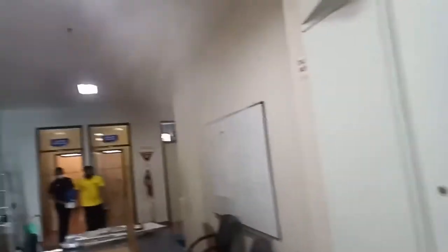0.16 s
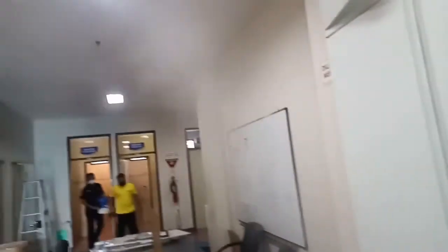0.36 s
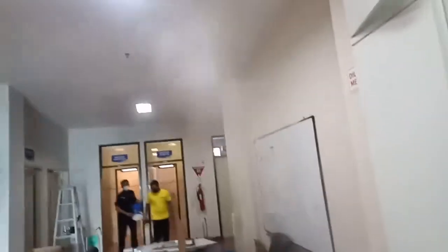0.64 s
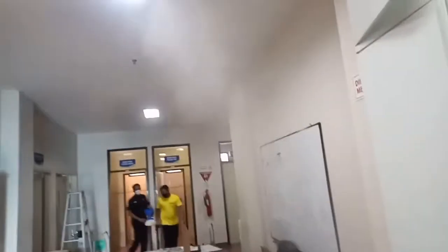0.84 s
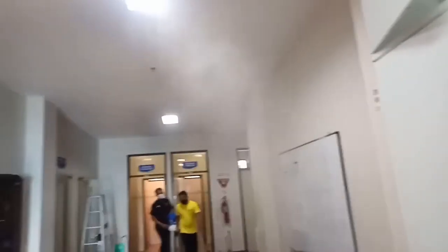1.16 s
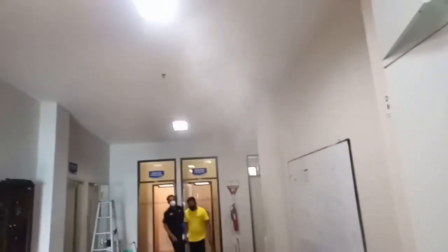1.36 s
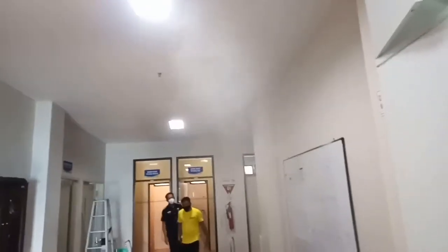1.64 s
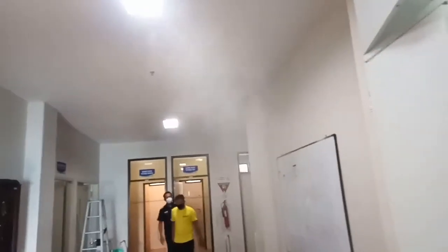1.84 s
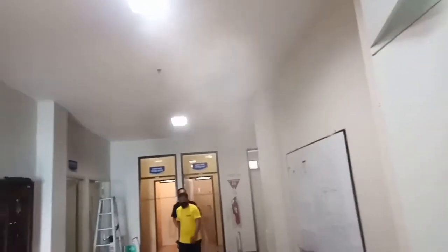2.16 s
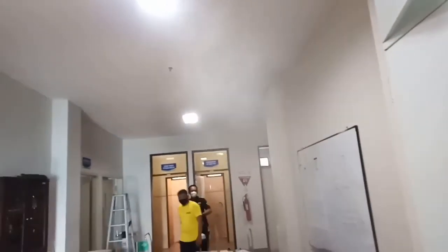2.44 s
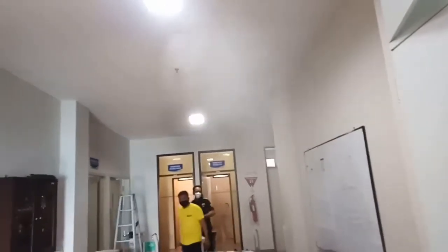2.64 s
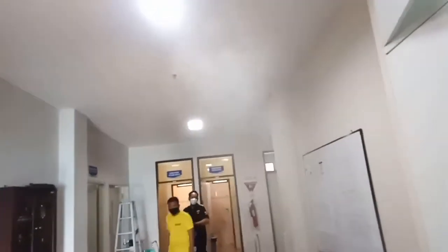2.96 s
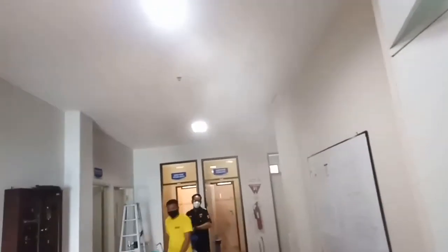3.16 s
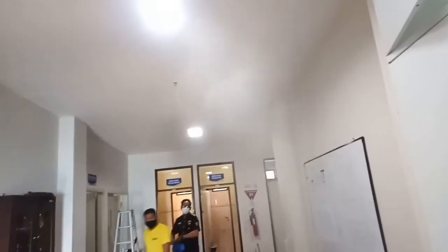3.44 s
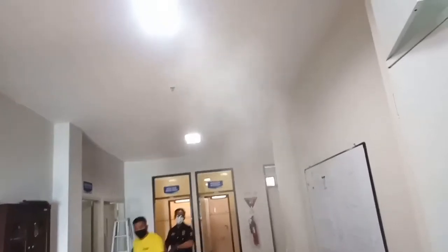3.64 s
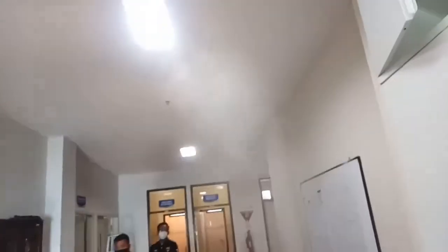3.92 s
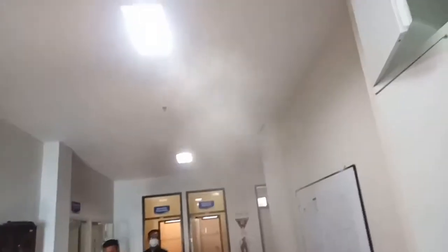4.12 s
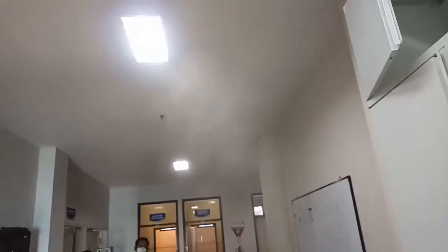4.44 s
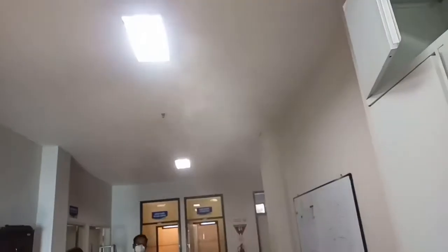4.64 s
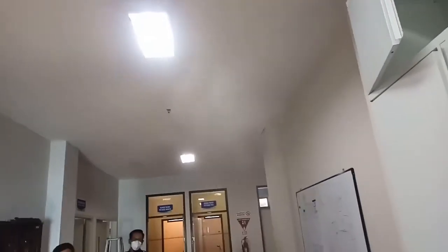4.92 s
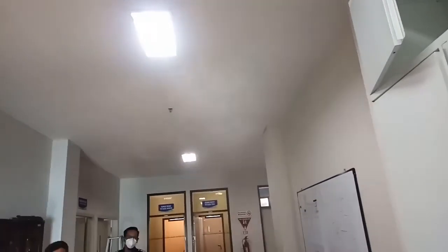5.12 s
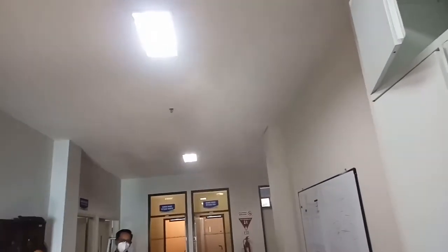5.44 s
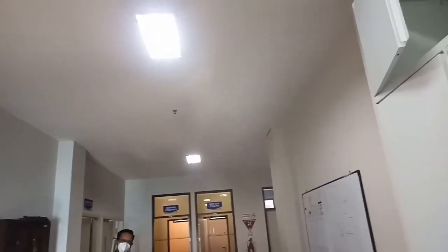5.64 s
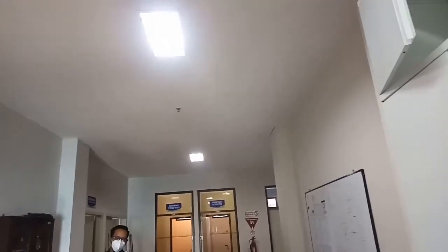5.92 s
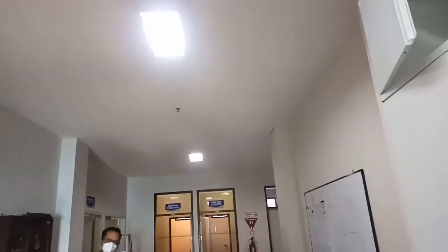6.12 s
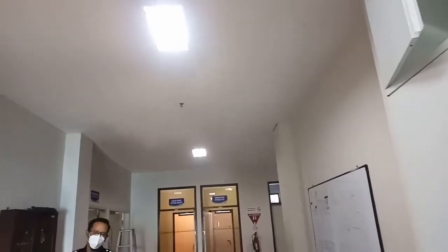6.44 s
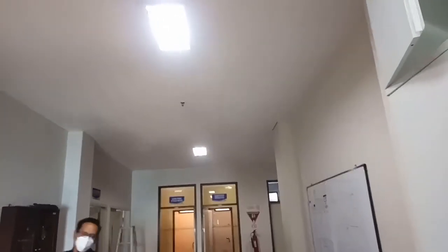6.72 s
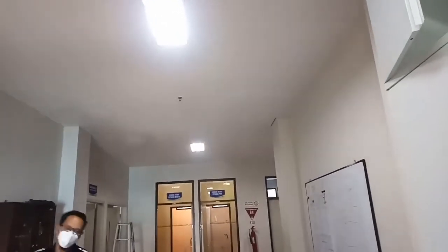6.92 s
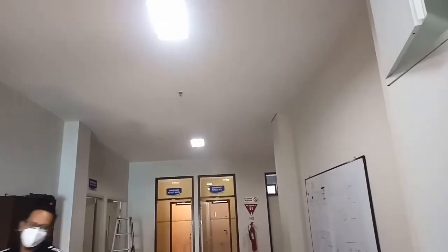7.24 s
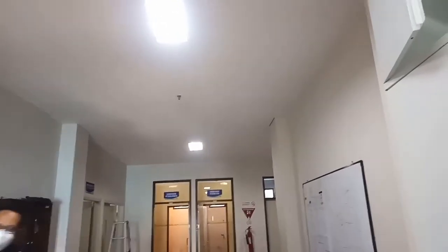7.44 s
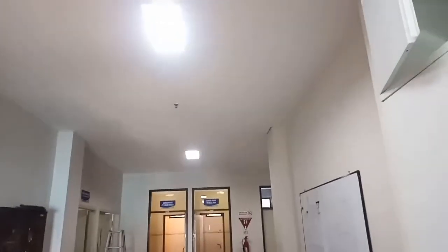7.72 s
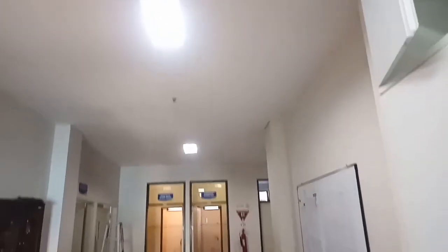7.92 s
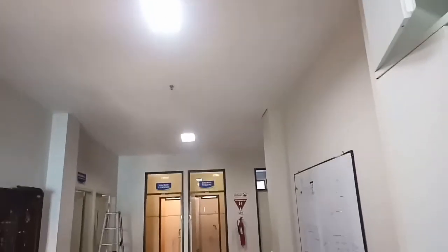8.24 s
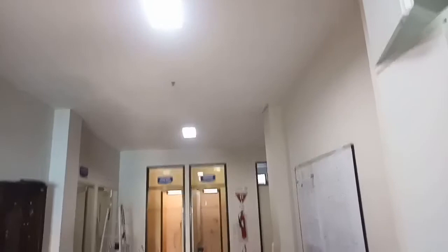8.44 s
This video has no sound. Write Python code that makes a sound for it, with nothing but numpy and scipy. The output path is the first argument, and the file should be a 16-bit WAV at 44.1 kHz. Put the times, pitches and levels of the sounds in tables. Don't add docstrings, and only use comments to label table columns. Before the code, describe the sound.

Steady motor hum and airy hiss of a mist blower indoors, followed by a piercing, fluttering whine that falls in pitch and dies away.

```python
import sys
import numpy as np
from scipy import signal
from scipy.fft import rfft, irfft, next_fast_len
from scipy.io import wavfile
from scipy.ndimage import uniform_filter1d, minimum_filter1d

SR = 44100
rng = np.random.default_rng(int(sys.argv[2]) if len(sys.argv) > 2 else 0)


def volts_from_db(level):
    exponent = np.asarray(level, float) / 20
    return 10 ** exponent


def generate_wav(sig):
    pcm = np.round(np.clip(np.atleast_2d(sig).T, -1, 1) * 32767).astype(np.int16)
    wavfile.write(sys.argv[1], SR, pcm)


N = 378378

RUN_HZ, OFF_S = 532.7, 4.0
BLADES = 9
# start_s (centre), level_db, half_length_s
ECHO_SWELLS = [(4.645, 7.5, 0.0055), (4.785, 8, 0.0045), (4.971, 2.5, 0.0015), (4.981, 3.5, 0.0016),
               (5.096, 5, 0.0029), (5.515, 5, 0.0044), (5.539, 6, .002), (5.575, 7.5, 0.0016),
               (5.594, 8, .002), (5.622, 8, 0.0045), (5.655, 5.5, 0.0013), (5.676, 4, 0.0047),
               (5.735, 5, 0.0063), (5.777, 5.5, 0.0018)]
# start_s, rush_db, brightening_db_per_octave (nozzle aimed nearer)
AIR_FLOW = [(0, -11, -1), (.9, -12.5, 1), (1.34, -12.5, 1.5), (1.8, -13.5, -4.5), (2.7, -14.5, -0.5),
            (3.3, -13.5, -2.5), (4.1, -17, -5.5), (4.7, -11.5, 0.5), (5.0, -20, 0.5), (5.3, -18, -9),
            (5.62, -14, -3), (5.9, -20, -1.5), (6.4, -17, -3), (7.1, -21, 0.5), (8.1, -29, -4),
            (8.58, -33.5, -7)]


def rms_one(x):
    return x / np.sqrt(np.mean(np.abs(x) ** 2) + 1e-20)


def in_time(rows, s):
    at, *columns = np.transpose(rows)
    return np.array([np.interp(s, at, column) for column in columns])


def at_hz(points, hz):
    point_hz, point_db = np.transpose(points)
    return np.interp(np.log(hz), np.log(point_hz), point_db)


def drift(rate_hz):
    r = np.exp(-2 * np.pi * rate_hz / SR)
    noise = rng.standard_normal(N + SR)
    return rms_one(signal.lfilter([1], [1, -2 * r, r * r], noise)[SR:])


def bumps_db(events):
    s = np.arange(N) / SR
    return sum(db * np.exp(-((s - at) / half) ** 2) for at, db, half in events)


def fade_out(s, centre_s, lasts_s):
    return .5 - .5 * np.tanh((s - centre_s) / lasts_s)


def speed(s):
    drag_hz, drag_per_s, drag_angle = 163.8, .15388, 1.27457
    coasting = drag_hz * np.tan(drag_angle - drag_per_s * np.maximum(s - OFF_S, 0))
    return np.minimum(RUN_HZ, coasting)


def hum(s):
    # start_s, level_db (rms)
    hum_curve = [
        (0, -46.5),
        (2, -44.5),
        (4.05, -42.5),
        (4.3, -68.5),
        (6.5, -52),
        (8.58, -56),
    ]
    level = volts_from_db(in_time(hum_curve, s)[0] + 2.2 * drift(3))
    return np.sqrt(2) * level * np.sin(2 * np.pi * 99.3 * s + 1.1 * drift(3))


def scuff(s):
    start_s, level_db = 8.548, -31
    band = signal.butter(5, [120, 2600], "band", fs=SR, output="sos")
    dull = signal.sosfilt(band, rng.standard_normal(N))
    return volts_from_db(level_db) * rms_one(dull) * np.clip((s - start_s) / .015, 0, 1)


def air_levels_db(s):
    # start_s (centre), lift_db, half_length_s
    nozzle_sweeps = [(0, -1, 0.15), (.25, 0.5, 0.22), (.71, 3, 0.089), (1.25, 1, 0.1), (1.74, 3, 0.1),
                     (2.14, 2.5, 0.14), (2.47, 3.5, 0.18), (3.05, 4, 0.12), (3.54, 5, .1),
                     (3.85, 2.5, 0.15), (4.07, 6, 0.11)]
    rush_db = in_time(AIR_FLOW, s)[0]
    sweeps_db = np.interp(s, np.arange(N) / SR, bumps_db(nozzle_sweeps))
    hidden = fade_out(s, 1.3, .3)
    turning = speed(s) / RUN_HZ

    def region_db(full_db, rush_share, speed_power, hidden_db, sweep_share):
        flow_db = full_db + rush_share * (rush_db + 13)
        speed_db = speed_power * 20 * np.log10(turning)
        return flow_db + speed_db + hidden_db * hidden + sweep_share * sweeps_db

    def with_cooling(level_db, cooling_db):
        return 10 * np.log10(volts_from_db(2 * level_db) + volts_from_db(2 * cooling_db) * turning ** (2 * 1.72))

    rumble = region_db(-28.5, .4, .49, -6.5, .48)
    nozzle = with_cooling(region_db(-34, .25, 2.5, -1, .8), -45.5)
    top = with_cooling(region_db(-32, .6, 2.5, -3.5, .8), -38.5)
    return np.vstack([rumble, rush_db + sweeps_db - .73, nozzle, top])


def air():
    region_centres = [500, 2500, 7500, 13000]
    # pitch_hz, level_db (per Hz)
    rush_colour = [(20, -30.5), (45, -44), (90, -25), (170, -27), (250, -22), (450, -13), (700, -16.5),
                   (1200, -16.5), (2300, -13), (3100, -12.5), (3800, -13.5), (4350, -23), (5000, -35.5),
                   (5700, -47.5)]
    # pitch_hz, level_db (per Hz)
    coast_colour = [(20, -29), (60, -31.5), (130, -15), (250, -16.5), (450, -10.5), (650, -14), (900, -11),
                    (1100, -14), (1550, -9), (2300, -14), (3450, -15), (4200, -31), (5000, -54),
                    (5700, -63)]
    # pitch_hz, level_db
    hiss_colour = [(5700, 0), (6500, 2), (7600, -1), (9700, -4), (10400, -2), (11000, -4), (11600, 0),
                   (12400, -2.5), (13000, -1), (13600, 4.5), (14500, 2.5), (15400, 5)]
    # pitch_hz, width_hz, lift_db
    resonances = [(231, 25, 7), (344, 30, 5), (633, 15, 3), (732, 35, 4), (927, 80, 4), (1350, 90, 3),
                  (2348, 50, 3), (2538, 50, 3), (2734, 50, 2), (2986, 90, 2)]
    # start_s, centre_hz, level_db
    body_shade = [
        (0, 5600, -6),
        (.5, 7200, -4.5),
        (.85, 8450, -5),
        (1.3, 9700, -9),
        (1.45, 10600, 6),
        (1.7, 10600, 0),
        (5.1, 11500, -1.5),
        (5.35, 11500, 5),
        (5.9, 10000, -2),
        (8.58, 10000, 1),
    ]
    knee_hz = 5700
    stft_size = dict(nperseg=2048, noverlap=1536)
    hz, s, frames = signal.stft(rng.standard_normal(N), SR, **stft_size)
    hz = np.maximum(hz, 10)

    fast = np.clip((speed(s) - 130) / (RUN_HZ - 130), 0, 1)
    body_hz = np.minimum(hz, knee_hz)
    colour = np.outer(at_hz(rush_colour, body_hz), fast) + np.outer(at_hz(coast_colour, body_hz), 1 - fast)
    colour += at_hz(hiss_colour, hz)[:, None]
    for peak_hz, width_hz, lift_db in resonances:
        colour += (lift_db / (1 + (2 * (hz - peak_hz) / width_hz) ** 2))[:, None]

    one_each = np.eye(len(region_centres))
    shares = np.array([np.interp(np.log(hz), np.log(region_centres), one) for one in one_each])
    home = shares > .6
    power = home @ volts_from_db(2 * colour) / len(hz)
    colour += shares.T @ (air_levels_db(s) - 10 * np.log10(power))

    aim = in_time(AIR_FLOW, s)[1]
    octaves = np.log2(hz / 2700)
    colour += np.outer(octaves * np.exp(-octaves ** 2), aim)

    patches = rng.standard_normal((40, len(s)))
    patches = rms_one(uniform_filter1d(uniform_filter1d(patches, size=9), size=9))
    rows = np.interp(np.log(hz), np.log([60, 16000]), [0, 39]).round().astype(int)
    colour += .9 * patches[rows]

    ripple = uniform_filter1d(rng.standard_normal(colour.shape), size=20)
    ripple = uniform_filter1d(ripple, size=2, axis=0)
    colour += 2.1 * rms_one(ripple) - .8

    shade_hz, shade_db = in_time(body_shade, s)
    colour += shade_db * np.exp(-(np.log(hz[:, None] / shade_hz) / .21) ** 2)
    return signal.istft(frames * volts_from_db(colour), SR, **stft_size)[1][:N]


def hall(x):
    t60_s = .9
    age = np.arange(int(1.2 * SR)) / SR
    tail = rng.standard_normal(len(age)) * volts_from_db(-60 * age / t60_s) * (age > .012)
    return signal.fftconvolve(x, tail / np.sqrt(np.sum(tail ** 2)))[:N]


def hall_modes(x):
    # pitch_hz, level_db (rms)
    modes = [(470, -21), (432, -22.5), (393, -24), (372, -24), (349, -18), (322, -25), (297, -21),
             (272, -23), (256, -30), (243, -33), (231.5, -20), (220.5, -27), (143, -47), (111.5, -36.5)]
    size = next_fast_len(N + SR)
    hz = np.arange(size // 2 + 1) * SR / size
    answer = 0
    for k, (mode_hz, db) in enumerate(modes):
        width_hz = 2.5 + .024 * mode_hz
        answer = answer + (-1) ** k * volts_from_db(db) / (1 + 2j * (hz - mode_hz) / width_hz) ** 2
    return irfft(rfft(x, size) * answer, size)[:N]


def whistle_reach(hz):
    # pitch_hz, width_hz,
    # level_db (rms)
    whistle_resonances = [(4520, 230, -27), (4200, 360, -22), (3880, 150, -16.5), (3450, 310, -10.5), (3030, 340, -6),
                          (2760, 290, -16), (2370, 340, -7), (2170, 100, -16),
                          (2040, 80, -25), (1940, 50, -26), (1740, 60, -29), (1610, 150, -24), (1480, 70, -27),
             (1395, 50, -29)]
    power = 3e-6
    for peak_hz, width_hz, db in whistle_resonances:
        power = power + volts_from_db(2 * db) * np.exp(-np.log(16) * ((hz - peak_hz) / width_hz) ** 2)
    return np.sqrt(power)


def blade_whistle(s, angle):
    # start_s, level_db (rms)
    beam = [(0, -34), (1.3, -35), (1.92, -31), (2.24, -41), (2.47, -29), (2.72, -39), (2.95, -29),
            (3.4, -50), (3.8, -44), (4.0, -33)]
    # start_s (centre), level_db, half_length_s
    dropouts = [(4.204, -9.5, .03), (4.363, -14, 0.036), (4.515, -12.5, 0.024), (4.62, -7, 0.0052),
                (4.682, -7, 0.0073), (4.745, -9.5, 0.022), (4.815, -6, 0.0047), (4.862, -8.5, 0.0028),
                (4.95, -6, 0.013), (5.027, -9, 0.016), (5.123, -12.5, 0.0072), (5.17, -7, 0.013),
                (5.22, -9, 0.019), (5.335, -8.5, 0.017), (5.41, -16, .0071), (5.53, -0.5, 0.0033),
                (5.555, -9.5, .0053), (5.6, -8, 0.029), (5.757, -1.5, 0.0017), (5.866, 1, .0047),
                (5.89, -14, 0.027), (5.925, -10, .0029), (5.97, -7.5, 0.015), (6.07, -6, 0.0075),
                (6.1, -9, 0.023), (6.16, -11, 0.029), (6.24, -16.5, .018), (6.29, -8, .015),
                (7.084, -10, 0.023), (7.293, -4, 0.04)]
    turns = speed(s)
    sliding = np.clip((RUN_HZ - turns) / 12, 0, 1)
    running = volts_from_db(in_time(beam, s)[0] + 1.5 * drift(2.4))
    carried = (1 - sliding) * running + sliding * whistle_reach(BLADES * turns)
    level = carried * volts_from_db(bumps_db(dropouts) + bumps_db(ECHO_SWELLS) + 1.3 * drift(45))
    return np.sqrt(2) * level * np.sin(BLADES * angle + .45 * drift(25))


def rotor(s, angle):
    # start_s, level_db (rms)
    carried_about = [(0, -19.5), (.32, -18.5), (.5, -22.5), (.7, -18), (1.15, -19.5), (1.72, -14),
                     (2.0, -18), (2.5, -15.5), (2.68, -21), (3.13, -13), (3.274, -20.5), (3.52, -12.5),
                     (3.74, -19.5), (3.82, -16.5), (3.97, -17.5), (4.073, -13)]
    # start_s, phase_step_rad
    swings = [
        (.5, .6),
        (1.02, 2.4),
        (1.045, -1.6),
        (1.18, -3.1),
        (1.2, 1.2),
        (3.27, 1.8),
    ]
    steady = fade_out(s, 4.11, .021)
    swing = sum(step * np.tanh((s - at) / .005) / 2 for at, step in swings)
    shaft = volts_from_db(1.6 * drift(8.1)) * np.sin(angle + swing + .04 * drift(6.7))
    octave = volts_from_db(-22 + 3 * drift(5)) * np.sin(2 * angle + .9 * drift(4))
    direct = steady * volts_from_db(in_time(carried_about, s)[0]) * (shaft + octave)
    ringing = hall_modes((1 - steady) * shaft) * volts_from_db(2.2 * drift(25))
    return np.sqrt(2) * (direct + ringing)


def scene():
    s = np.arange(N) / SR
    angle = 2 * np.pi * np.cumsum(speed(s)) / SR
    low = rotor(s, angle)
    whistle = blade_whistle(s, angle)
    sliding = np.clip((s - OFF_S) / .1, 0, 1)
    echoes = hall(volts_from_db(-8) * whistle + volts_from_db(-10) * low * sliding)
    return (low + whistle + echoes + air() + hum(s) + scuff(s))[None]


def band_limit(x):
    return signal.sosfilt(signal.butter(12, 16070, fs=SR, output="sos"), x)


def record(dry):
    limit_db, outrun, throb_samples = -.05, .3, 512
    high = signal.butter(4, 10500, "high", fs=SR, output="sos")
    top = signal.sosfiltfilt(high, dry)
    phase = 2 * np.pi * np.arange(N) / throb_samples
    throb = .26 * np.cos(phase) + .14 * np.cos(2 * phase)

    wall = signal.ellip(12, .5, 60, 15480, fs=SR, output="sos")
    walled = signal.sosfilt(wall, dry + top * throb)

    ceiling = volts_from_db(limit_db + outrun * bumps_db(ECHO_SWELLS))
    headroom = np.minimum(1, ceiling / (np.abs(walled) + 1e-9))
    gain = uniform_filter1d(minimum_filter1d(headroom, size=121), size=121)
    return band_limit(np.clip(walled * gain, -1, 1))


dry = scene()
out = record(dry)
generate_wav(out)
```